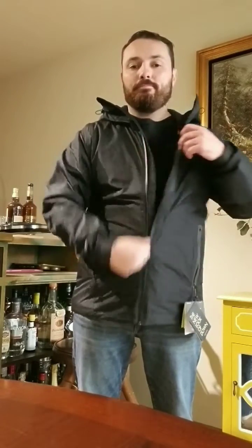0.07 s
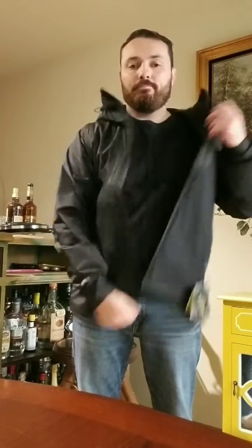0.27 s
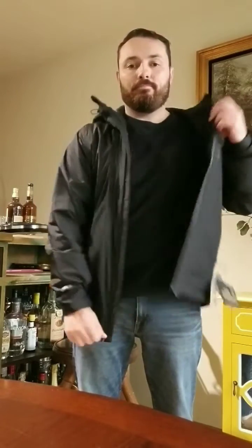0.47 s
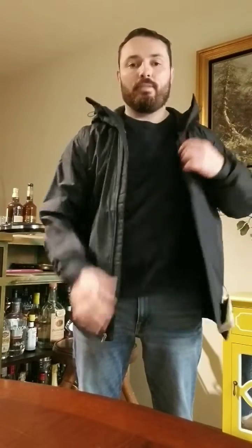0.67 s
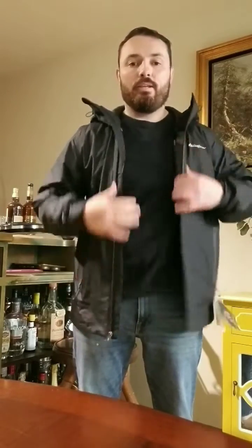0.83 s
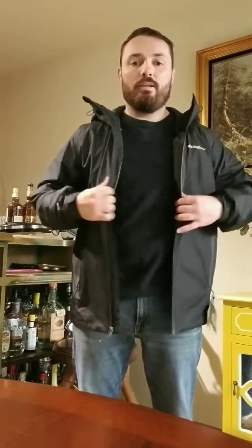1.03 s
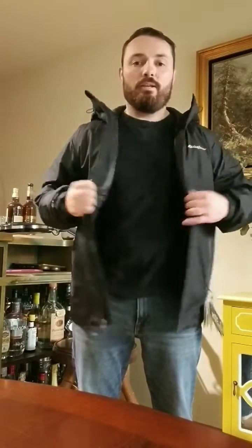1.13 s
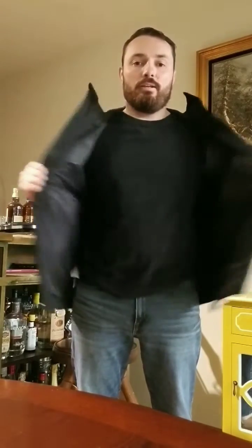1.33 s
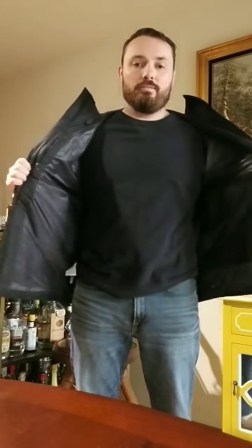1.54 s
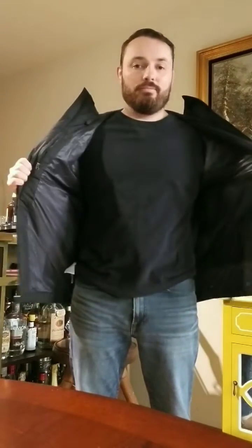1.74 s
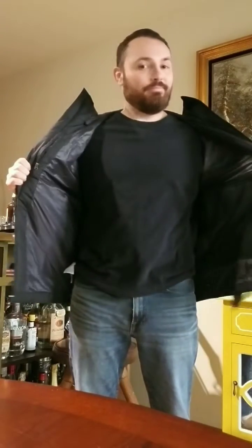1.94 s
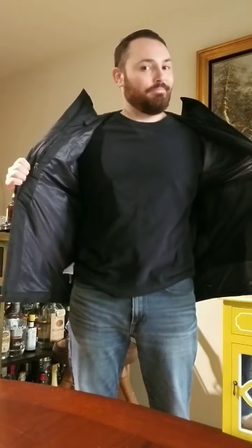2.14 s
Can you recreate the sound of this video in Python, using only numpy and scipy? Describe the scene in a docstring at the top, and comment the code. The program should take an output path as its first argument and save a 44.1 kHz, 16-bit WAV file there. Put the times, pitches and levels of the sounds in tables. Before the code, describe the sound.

Indoors, picked up by a phone a short distance away, a jacket zipper rips down in a quarter second, followed by crisp nylon rustles, small crease snaps, soft flaps and a last faint swish.

```python
"""A coil zipper on a nylon jacket is pulled down in one go, over the faint hum of a furnished room.
First its teeth snap through the slider: pulses drum on the jacket front, each with a scrape of noise.
From a quarter second, sleeves and panels hiss and crumple as the jacket is opened: noise with crackles,
plus single snaps and two soft flaps of air. Last, near 1.8 s, the collar swishes once."""
import sys
import numpy as np
from scipy import signal
from scipy.fft import rfft, irfft
from scipy.io import wavfile
from scipy.ndimage import uniform_filter1d

SR = 44100
rng = np.random.default_rng(int(sys.argv[2]) if len(sys.argv) > 2 else 0)


def transcribe(u):
    """Save the signal u as a 16-bit wav file named by the first command-line argument.

    u: samples, shape (n,) or (channels, n), limited to [-1, 1]; the rate is SR.
    q: integer samples, one column per channel.
    """
    v = np.clip(np.atleast_2d(u).T, -1, 1)
    q = np.round(v * 32767).astype(np.int16)
    wavfile.write(sys.argv[1], SR, q)


def ratio_of_db(decibels):
    """Turn decibels (scalar or array-like) into linear amplitude factors; 0 dB maps to 1."""
    return 10 ** (np.asarray(decibels, float) / 20)


N = 97064
t = np.arange(N) / SR


def colour(x, table):
    """Causal minimum-phase filter through (Hz, dB) points, from the cepstrum of the gain."""
    points = np.array(table, float)
    hz = np.maximum(np.arange(1025) * SR / 2048, 1)
    log_gain = np.interp(np.log(hz), np.log(points[:, 0]), points[:, 1]) * np.log(10) / 20
    cepstrum = irfft(log_gain)
    cepstrum[1:1024] *= 2  # fold onto positive time
    cepstrum[1025:] = 0
    impulse = irfft(np.exp(rfft(cepstrum)))
    return signal.fftconvolve(x, impulse)[:len(x)]


def unit(x):
    """Scale to rms 1."""
    return x / np.sqrt(np.mean(x ** 2))


def curve(table, col=1):
    """A table column interpolated over time."""
    points = np.array(table, float)
    return np.interp(t, points[:, 0], points[:, col])


def band(x, lo_hz, hi_hz):
    """Gentle band-pass."""
    edges_hz = np.clip([lo_hz, hi_hz], 20, .45 * SR)
    return signal.sosfilt(signal.butter(2, edges_hz, "band", fs=SR, output="sos"), x)


def walk(rate_hz):
    """Random levels held 1 / rate_hz and slewed twice; spread near 1."""
    hold = int(SR / rate_hz)
    steps = np.repeat(rng.standard_normal(N // hold + 1), hold)
    return 1.3 * uniform_filter1d(uniform_filter1d(steps, hold), hold)[:N]


def ports(left, right):
    """Two unrelated sounds blended so that the bass is mostly shared and the treble is not."""
    alike_hz, bass_apart = 750, .08
    apart = left - right
    high_pass = signal.butter(1, alike_hz, "high", fs=SR)
    side = signal.lfilter(*high_pass, apart) + bass_apart * apart
    return np.array([left + right + side, left + right - side]) / 2 ** .5


def coloured_noise(table):
    """Steady stereo noise of a given colour."""
    return ports(*(colour(rng.standard_normal(N), table) for _ in range(2)))


def room_tone():
    """Faint hum of the room: steady coloured noise."""
    # spectrum of the hum: (frequency [Hz], level [dB])
    hum_colour = [(12, -60), (20, -18), (65, -4.5), (101, -27.5), (138, 0.5), (158, -27.5), (234, -12),
                  (285, -25.5), (367, -15.5), (422, -24.5), (825, -28), (1330, -34.5), (5230, -34),
                  (16000, -38.5)]
    rms_db = -69
    return ratio_of_db(rms_db) * unit(coloured_noise(hum_colour))


def rub(table, grit_db, flicker_db, per_s):
    """Fibres catching over a wide area: noise and uneven crackles, drawn apart for each port."""
    chance, spread, sign = rng.random((3, 2, N))
    height = np.minimum(-np.log(1 - spread), 3)
    crackles = ratio_of_db(grit_db * height) * np.sign(sign - .5) * (chance < per_s / SR)
    grit = rng.standard_normal((2, N)) + 0.84 * unit(crackles)
    rubbed = unit(ports(*(colour(g, table) for g in grit)))
    return rubbed * ratio_of_db(flicker_db * walk(25.22))


def cloth():
    """Weave hiss and crumpling panels as the jacket falls open: two rubs of different colour."""
    # course of the cloth: (time [s], weave hiss level [dB], panel crumple level [dB])
    course = [(0.22, -12, -35), (0.24, -42.5, -33), (0.258, -30.5, -34), (0.292, -42, -42),
              (0.322, -39.5, -40), (0.386, -50.5, -50.5), (0.45, -58, -53), (0.58, -49.5, -51.5),
              (0.67, -41, -51), (0.798, -45.5, -53), (0.88, -50.5, -48.5), (0.948, -54, -62),
              (1.248, -49, -53), (1.326, -42, -46), (1.394, -44, -44.5), (1.502, -67.5, -66),
              (1.614, -61.5, -89), (1.656, -79, -98), (1.76, -78, -108)]
    # spectrum of the weave hiss: (frequency [Hz], level [dB])
    weave = [(880, -46), (1500, -4.5), (1610, -6), (3350, -8.5), (4000, -1.5), (6370, -1), (8740, -15.5),
             (12600, -1), (16000, -8.5)]
    # spectrum of the crumpling panels: (frequency [Hz], level [dB])
    panels = [(120, -20.5), (220, -16), (320, -10.5), (500, -1), (900, -2), (1500, -7), (3000, -5.5),
              (6000, -13.5), (12000, -31)]
    fade_in_s, fade_out_s = .04, .02
    fade_in = np.clip((t - course[0][0]) / fade_in_s, 0, 1)
    fade_out = np.clip((course[-1][0] - t) / fade_out_s + 1, 0, 1)
    hiss = ratio_of_db(curve(course)) * rub(weave, grit_db=6.5, flicker_db=2.54, per_s=2500)
    crumple = ratio_of_db(curve(course, col=2)) * rub(panels, grit_db=5, flicker_db=1.1, per_s=670)
    return fade_in * fade_out * (hiss + crumple)


def collar_swish():
    """The collar brushes past once: a bright rub that swells and dies."""
    # course of the swish: (time [s], level [dB])
    course = [(1.765, -73), (1.782, -47), (1.797, -43), (1.825, -47), (1.858, -48), (1.9, -56), (1.97, -67),
              (2.07, -72), (2.2, -92)]
    # spectrum of the swish: (frequency [Hz], level [dB])
    swish_colour = [(530, -61), (900, -21), (1280, -25), (1370, -17), (2120, -8.5), (6890, -1.5),
                    (8760, -15), (12300, -1.5), (16000, -1)]
    swish = ratio_of_db(curve(course)) * rub(swish_colour, grit_db=2.0, flicker_db=0.2, per_s=2000)
    return (t > course[0][0]) * swish


def flaps():
    """The fronts flap and push air: low noise that swells and dies away softly."""
    # flaps: (start [s], level at the height [dB], rise [s])
    pushes = [(.245, -51, 0.016), (1.27, -61, 0.067)]
    out = np.zeros(N)
    air = unit(band(rng.standard_normal(N), 60, 420))
    for start_s, level_db, rise_s in pushes:
        since = np.maximum(t - start_s, 0) / rise_s
        out += ratio_of_db(level_db) * since * np.exp(1 - since) * air
    return out


def snaps():
    """Single snaps of creases and slider: a click and noise, decaying fast, in one band each."""
    # snaps: (time [s], peak [dB], centre [Hz], width [Hz])
    cracks = [(.247, -25, 550, 350), (.2532, -24, 13000, 5000), (.257, -26, 600, 350),
              (.266, -28, 14000, 3500), (.267, -26, 520, 350), (.657, -33, 2500, 4000),
              (.824, -36, 3000, 5000), (.9621, -42, 4000, 5000), (1.1242, -38, 3000, 5000),
              (1.386, -33, 1500, 2500), (1.7942, -42, 6000, 5000), (2.0327, -53, 6800, 2000)]
    decay_s = .0012
    out, age_s = np.zeros(N), np.arange(600) / SR
    noises = rng.standard_normal((len(cracks), len(age_s)))
    for (start_s, peak_db, hz, width_hz), noise in zip(cracks, noises):
        burst = (noise + 4 * (age_s == 0)) * np.exp(-age_s / decay_s)
        crack = band(burst, hz - width_hz / 2, hz + width_hz / 2)
        first = int(start_s * SR)
        out[first:first + len(age_s)] += ratio_of_db(peak_db) * crack / np.abs(crack).max()
    return out


def tooth_pulses(phase):
    """One pulse per tooth, uneven in time and size, placed between samples."""
    jitter_teeth, scatter_db = .045, 3
    teeth = np.arange(1, int(phase[-1]))
    jitter, scatter = rng.standard_normal((2, len(teeth)))
    at = np.clip(np.interp(teeth + jitter_teeth * jitter, phase, np.arange(N)), 0, N - 2)
    size = ratio_of_db(scatter_db * scatter)
    pulses, i = np.zeros(N), at.astype(int)
    np.add.at(pulses, i, size * (1 - at + i))
    np.add.at(pulses, i + 1, size * (at - i))
    return pulses


def zipper():
    """Each tooth drums the jacket front with a pulse; the slider scrapes after each."""
    # course of the slider: (time [s], mean tooth rate [Hz], drumming level [dB], scrape level [dB])
    pull = [(0, 484.8, -30.5, -37.5), (.035, 498.5, -32.5, -35), (.05, 546.1, -37, -39),
            (.09, 593.1, -33.5, -37.5), (.105, 659.2, -31, -37), (.13, 734.7, -29.5, -35.5),
            (.15, 831, -35, -34.5), (.185, 866.7, -34.5, -34), (.2, 777.6, -30.5, -31.5),
            (.212, 733, -37.5, -32), (.222, 597.7, -28, -28), (.24, 530, -39, -39.5), (.28, 420, -47, -46)]
    # response of the jacket front: (frequency [Hz], gain [dB])
    front = [(150, -34), (330, -17), (480, 7), (850, -4.5), (1600, -13), (2600, -16.5), (4000, -21.5),
             (12000, -71)]
    # spectrum of the scrape: (frequency [Hz], level [dB])
    scrape_colour = [(1060, -18), (1800, -7), (2300, -2), (3740, -7), (4170, -6.5), (5010, -9.5),
                     (6360, -3.5), (8440, -22.5), (13600, -2), (16000, -17.5)]
    wobble, scrape_decay_teeth = .025, 0.4
    stop_s, stop_fade_s = .262, 0.04
    spread_hz, spread_radius = 1300, .85

    phase = np.cumsum(curve(pull) * (1 + wobble * walk(60))) / SR  # in teeth
    scrape = np.exp(-(phase % 1) / scrape_decay_teeth) * coloured_noise(scrape_colour)
    # all-pass: the tape delays the overtones of each tooth
    pole = [1, -2 * spread_radius * np.cos(2 * np.pi * spread_hz / SR), spread_radius ** 2]
    drum = signal.lfilter(pole[::-1], pole, colour(tooth_pulses(phase), front))
    drum = ratio_of_db(curve(pull, col=2)) * drum / drum[t < stop_s].std()
    moving = 1 / (1 + np.exp(np.clip((t - stop_s) / stop_fade_s * 4, -50, 50)))
    return moving * (drum + ratio_of_db(curve(pull, col=3)) * unit(scrape))


def room(x, count=6):
    """Direct sound plus diffuse noise tails whose decay depends on pitch; echo patterns take turns."""
    # reverberation: (frequency [Hz], time to fall 60 dB [s])
    decay = [(200, 0.27), (700, 0.39), (2500, 0.61), (6000, 0.73), (13000, 0.6)]
    tail_gain_db, first_echo_s = -5, .004
    pattern_s = .05  # the moving cloth meets the next echo pattern this often
    age_s, points = np.arange(int(.6 * SR)) / SR, np.array(decay)
    tails = np.zeros((2, count, len(age_s)))
    for hz in 90 * 2. ** np.arange(8):
        t60_s = np.interp(np.log(hz), np.log(points[:, 0]), points[:, 1])
        octave = band(rng.standard_normal(tails.shape), hz / 2 ** .5, hz * 2 ** .5)
        # equal energy whatever the decay
        tails += octave * ratio_of_db(-60 * age_s / t60_s) / np.sqrt(t60_s * SR / (2 * np.log(1000)))
    tails = ports(*(tails * (age_s > first_echo_s))) * ratio_of_db(tail_gain_db)
    # crossfade from pattern to pattern, round and round
    away = (t / pattern_s - np.arange(count)[:, None] + count / 2) % count - count / 2
    share = np.cos(np.pi / 2 * np.clip(away, -1, 1))
    sent = (x.mean(axis=0) * share)[None]
    return x + signal.fftconvolve(sent, tails, axes=2)[:, :, :N].sum(axis=1)


def scene():
    """Jacket in the room, a shade louder on the left, over the room tone."""
    left_db = 0.14
    jacket = room(zipper() + snaps() + flaps() + cloth() + collar_swish())
    return jacket * ratio_of_db(np.array([[left_db], [0]])) + room_tone()


def top_cut(x):
    """Nothing passes above the cut-off."""
    return signal.sosfilt(signal.butter(12, 17040, fs=SR, output="sos"), x)


def record(dry):
    """The phone cuts the top with a steep low-pass."""
    top_hz = 15800
    low_pass = signal.ellip(10, .2, 60, top_hz, fs=SR, output="sos")
    mix = signal.sosfilt(low_pass, dry)
    return top_cut(mix)


dry = scene()
out = record(dry)
transcribe(out)
```